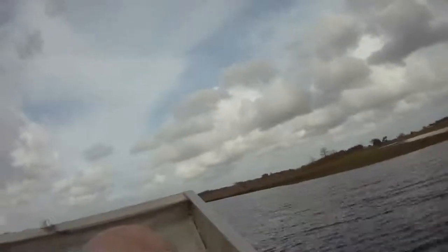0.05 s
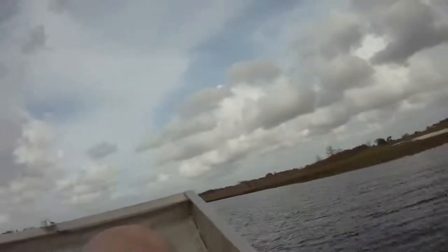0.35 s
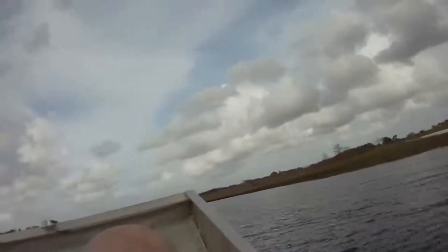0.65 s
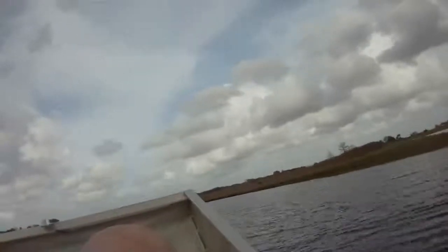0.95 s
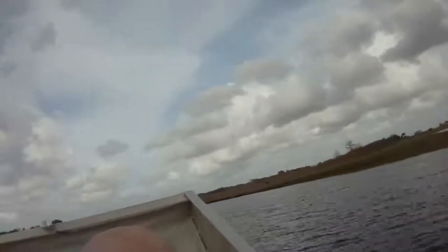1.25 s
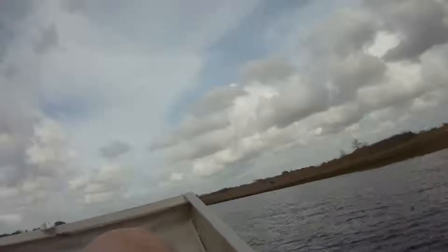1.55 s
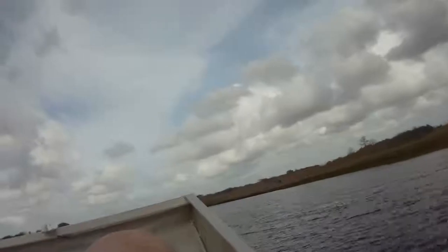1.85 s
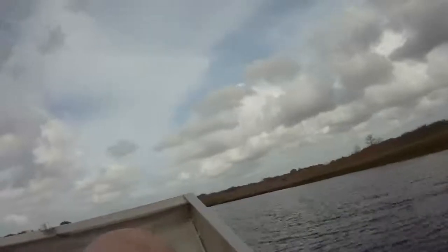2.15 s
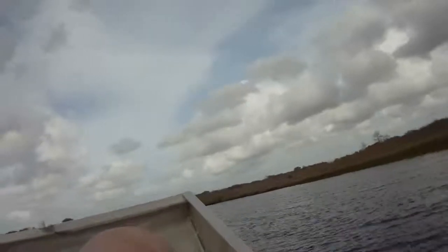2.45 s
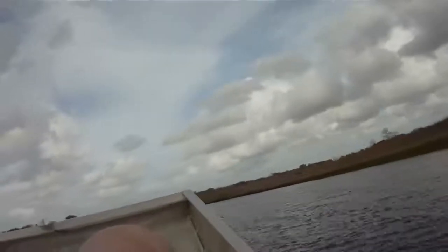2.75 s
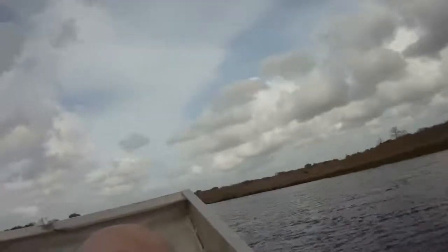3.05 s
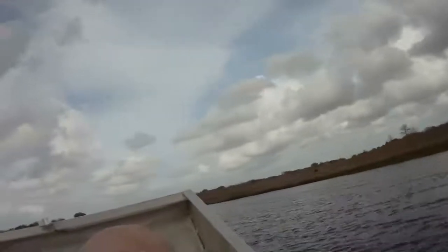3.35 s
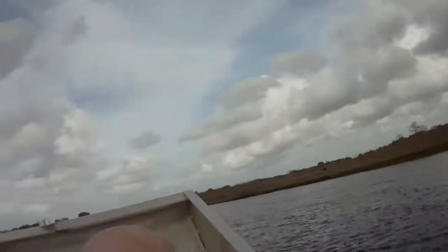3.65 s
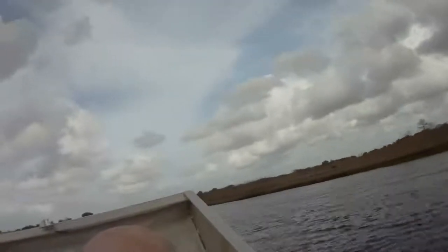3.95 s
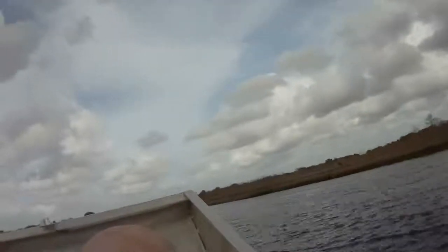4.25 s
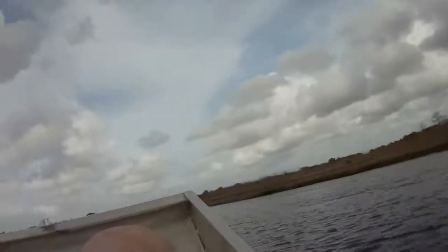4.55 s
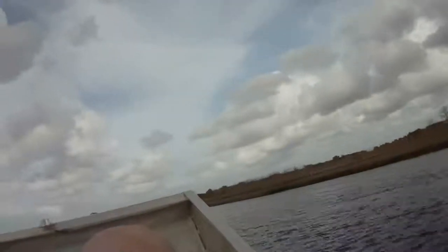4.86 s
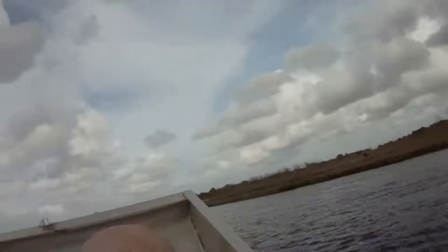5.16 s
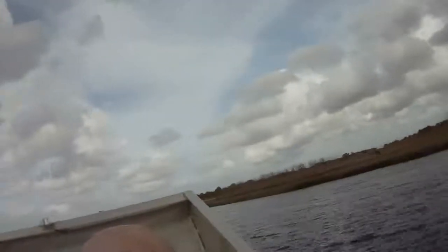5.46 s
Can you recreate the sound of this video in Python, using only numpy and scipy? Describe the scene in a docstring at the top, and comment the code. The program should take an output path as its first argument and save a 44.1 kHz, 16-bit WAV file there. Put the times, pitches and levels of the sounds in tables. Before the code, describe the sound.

From the first moment to the end, nearly six seconds later, an airboat engine runs loud and close at steady throttle, heard from a seat on board on open water. Its deep drone holds one pitch and is the loudest sound. Rapid, uneven exhaust blasts add a burble, a hard bark and a gassy rasp. The bark swells slightly around 0.3, 2.1 and 4.9 seconds. Beneath the engine, the propeller and the water under the hull make a constant, softer rush. The sound sits in the middle, almost the same in both ears. A fine crackle runs all the way through, with a few sharp ticks toward the right, the clearest at about 0.7, 1.2, 2.6, 3.6 and 5.2 seconds.

```python
"""On open water, from a seat on an airboat cruising at steady throttle.
The V8 engine fires eight uneven exhaust blasts per cycle. They make a deep drone and a burble in the
pipes, with a hard bark and a rasp of gas on each blast. Propeller and water add a steady rush.
Both ears hear nearly the same, but left and right slip apart for moments, which adds a fine crackle
with a few sharp ticks in it."""
import sys
import numpy as np
from scipy import signal
from scipy.fft import rfft, irfft
from scipy.io import wavfile
from scipy.ndimage import uniform_filter1d

SR = 44100
rng = np.random.default_rng(int(sys.argv[2]) if len(sys.argv) > 2 else 0)


def waveform_to_disk(signal):
    """Save audio, clipped to [-1, 1], as 16-bit WAV at the path in sys.argv[1]."""
    frames = np.transpose(np.atleast_2d(signal))
    scaled = np.clip(frames, -1, 1) * 32767
    samples = np.round(scaled).astype(np.int16)
    wavfile.write(sys.argv[1], SR, samples)


N = 251370
TIME = np.arange(N) / SR

# Engine speed, almost steady: time_s, speed_rpm
ENGINE_SPEED = [(0, 2917.7), (1.4, 2920.3), (3.2, 2917.3), (4.6, 2921.2), (5.7, 2913.1)]
# The eight exhaust blasts in one engine cycle: position_0_to_1, relative_level_db
BLASTS = [(.083, 5.5), (.235, -7), (.305, -0.5), (.418, 6), (0.636, 2), (.748, 6), (0.848, -4.5),
          (0.993, 3.5)]
# The tones that make up the drone: multiple_of_cycle_rate, relative_level_db
DRONE_TONES = [(1, -68), (2, -66), (3, -11), (4, -30.5), (5, -9.5), (6, -21.5), (7, -24.5), (8, -7),
               (9, -11), (10, -24.5), (11, -9), (12, -7), (13, -27), (14, -37), (15, -3.5), (16, -13.5),
               (17, -29.5), (18, -6), (19, -11), (20, -23), (21, -7), (22, -28), (23, -14), (24, 3),
               (25, -32), (26, -21), (27, -7), (28, -21), (29, -13.5), (30, -4), (31, -19.5), (32, -15.5),
               (33, -10), (34, -63), (35, -14.5), (36, -48), (37, -31), (38, -15)]
# Notes at which the exhaust pipes ring: pitch_hz, width_hz, gain_db
PIPE_NOTES = [(212, 38, -21.5), (382, 34, -14), (594, 20, 6.5), (720, 72, 4.5)]
# Slow rise and fall of the bark: time_s, gain_db
BARK_SWELL = [(0, 1.5), (.3, 2.5), (1.8, -1.5), (2.13, 2.5), (2.45, -2.5), (3.15, -0.3), (4.2, -2),
              (4.9, 2), (5.7, 0)]
# Tone colour of the crack at the front of a blast: pitch_hz, gain_db
BARK_COLOUR = [(780, -37), (920, 7), (1020, 8.5), (1300, 14.5), (1600, 8), (2100, -6), (2450, -9),
               (2670, 6.5), (2900, -9), (4500, -16), (7000, -42), (15000, -56)]
# Tone colour of the rasping gas: pitch_hz, gain_db
GAS_COLOUR = [(400, 5), (900, 11), (1600, 7.5), (2100, -0.5), (2450, 3.5), (2670, -6), (2900, -5.5),
              (4200, -7.5), (5200, -13), (6800, -23), (9000, -19.5), (11500, -50.5), (15000, -46)]
# How much the rush differs between left and right: pitch_hz, gain_db
WASH_SPREAD = [(120, -2), (280, -9), (550, -15), (1800, -12), (4000, -6), (10000, -5)]
# Tone colour of the propeller and water: pitch_hz, gain_db
WASH_COLOUR = [(20, -35), (60, -25), (120, -15.5), (220, -1.5), (600, 3.5), (800, -1.5), (1050, -14.5),
               (2000, -13.5), (2700, -17), (5200, -29), (6800, -27.5), (8500, -35.5), (11500, -32),
               (15000, -40.5)]
# The sharpest ticks: start_s, relative_level_db, pan_db (added on the left, taken off on the right)
TICKS = [(0.2467, -29, -10), (0.715, -26.5, -8), (1.248, -25, -8), (2.384, -30, -7), (2.617, -25, -2.5),
         (3.0833, -31, -9), (3.5507, -27, -10), (4.0845, -30, -8), (5.153, -26, -5)]
# Tone colour of a tick: pitch_hz, gain_db
TICK_COLOUR = [(300, 4), (1500, 10), (5000, 4), (10000, -1.5), (15000, -3)]


def undb(db):
    """Turn decibels into a number to multiply by."""
    return 10 ** (np.asarray(db) / 20)


def level(x, db):
    """Set a sound's average (rms) level."""
    return x * undb(db) / np.sqrt(np.mean(x ** 2))


def colour(x, points):
    """Turn lows and highs up or down along a curve of (pitch_hz, gain_db) points."""
    hz, db = np.transpose(points)
    f = np.maximum(np.arange(N // 2 + 1) * SR / N, 1)
    return irfft(rfft(x) * undb(np.interp(np.log(f), np.log(hz), db)), N)


def resonance(f, pitch_hz, width_hz):
    """How a ringing pipe passes and delays each frequency f."""
    return 1j * f * width_hz / (pitch_hz ** 2 - f ** 2 + 1j * f * width_hz)


def wander(per_s):
    """A smooth random curve of typical size 1, with per_s new values a second."""
    step = int(SR / per_s)
    held = np.repeat(rng.standard_normal(N // step + 1), step)[:N]
    return level(uniform_filter1d(uniform_filter1d(held, step), step), 0)


def clicks(times, sizes):
    """Clicks, each shared between its two nearest samples."""
    at = np.clip(times * SR, 0, N - 2)
    i = at.astype(int)
    return np.bincount(i, sizes * (1 - at + i), N) + np.bincount(i + 1, sizes * (at - i), N)


def firings(cycles, scatter_db, jitter_s):
    """Time and strength of every blast; no two burns of fuel are quite alike."""
    position, db = np.transpose(BLASTS)
    due = (np.arange(-1, cycles[-1] + 1)[:, None] + position).ravel()
    late, strong = rng.standard_normal((len(due), 2)).T
    times = np.interp(due, cycles, TIME) + jitter_s * late
    sizes = undb(np.resize(db, len(due)) + scatter_db * np.clip(strong, -2, 1))
    heard = (due > 0) & (due < cycles[-1])
    return times[heard], sizes[heard]


def drone(cycles, db, waver_db, pipe_hz, pipe_width_hz):
    """The repeating blasts make a stack of tones, each delayed by the pipe's main ring."""
    position, blast_db = np.transpose(BLASTS)
    cycle_hz = cycles[-1] * SR / N
    out = 0
    for multiple, tone_db in DRONE_TONES:
        push = -np.sum(undb(blast_db) * np.exp(-2j * np.pi * multiple * position))
        phase = np.angle(push * resonance(multiple * cycle_hz, pipe_hz, pipe_width_hz))
        gain = undb(tone_db + waver_db * wander(per_s=6))
        out = out + gain * np.cos(2 * np.pi * multiple * cycles + phase)
    return level(out, db)


def burble(times, sizes, db):
    """Each burn pushes a bit too much or too little, ringing the pipes between the drone's tones."""
    kicks = clicks(times, np.sqrt(sizes) * (rng.random(len(times)) - .5))
    f = np.arange(N // 2 + 1) * SR / N
    pipes = sum(undb(gain_db) * resonance(f, hz, width) for hz, width, gain_db in PIPE_NOTES)
    return level(irfft(rfft(kicks) * pipes, N), db)


def overload(x, ceiling_db):
    """Heavy low notes overload the microphone, which evens them out and drops the deepest rumble."""
    limited = undb(ceiling_db) * np.tanh(x / undb(ceiling_db))
    return colour(limited, [(15, -20), (65, 0)])


def bark(times, sizes, db, lead_s, lead_share, cluster_db, clusters_per_s):
    """Each blast is a short, uneven push, then a sharp suck; they hit harder in random clusters."""
    swell_db = np.interp(times, *np.transpose(BARK_SWELL))
    surge_db = cluster_db * np.interp(times, TIME, wander(clusters_per_s))
    suck = sizes * undb(swell_db + surge_db)
    push = lead_share * suck * 2 * rng.random(len(times))
    pressure = clicks(times - lead_s, push) - clicks(times, suck)
    return level(colour(pressure, BARK_COLOUR), db)


def gas_rasp(times, sizes, db, puff_s, tail_s, tail_share):
    """Swirling gas hisses in a short puff around each blast, with a weak tail."""
    t = np.arange(-1000, 1001) / SR
    puff = np.exp(-np.abs(t) / puff_s)
    tail = tail_share * (t > 0) * np.exp(-np.abs(t) / tail_s)
    flow = signal.fftconvolve(clicks(times, sizes), puff + tail, "same")
    middle, side = rng.standard_normal((2, N))
    hiss = middle + undb(-30) * np.array([side, -side])  # almost the same in both ears
    return level(colour(flow * hiss, GAS_COLOUR), db)


def wash(db, flicker_db):
    """The rush of air churned by the propeller and of water under the hull."""
    middle, side = rng.standard_normal((2, N))
    side = colour(side, WASH_SPREAD)
    rush = colour(middle + np.array([side, -side]), WASH_COLOUR)
    return level(rush * undb(flicker_db * wander(per_s=250)), db)


def crackle(sound, share, slip_s, length_s, beats_per_s):
    """On some beats of a fast, even pulse, left and right each jump briefly out of step."""
    first_s = .0147
    starts = np.arange(first_s, N / SR, 1 / beats_per_s)
    nearest = np.clip(np.round((TIME - first_s) * beats_per_s).astype(int), 0, len(starts) - 1)
    age_s = TIME - starts[nearest]
    dice = rng.uniform(0, 1, (len(starts), 5))[nearest].T
    chosen = dice[0] < share
    out = []
    for channel, jump, hold in zip(sound, dice[1:3], dice[3:5]):
        slipping = chosen & (age_s > 0) & (age_s < (.5 + hold) * length_s)
        blend = uniform_filter1d(slipping.astype(float), size=9)
        shifted = np.interp(TIME + slip_s * (2 * jump - 1), TIME, channel)
        out.append(channel + blend * (shifted - channel))
    return np.array(out)


def ticks(gain_db, delay_s):
    """Single sharp ticks, louder on the right."""
    times, db, pan_db = np.transpose(TICKS)
    pair = [clicks(times + delay_s, undb(db + gain_db + side * pan_db)) for side in (1, -1)]
    return colour(np.array(pair), TICK_COLOUR)


def scene():
    """One turning crankshaft times all the engine sounds, over the rush of air and water."""
    rpm = np.interp(TIME, *np.transpose(ENGINE_SPEED))
    cycles = np.cumsum(rpm) / (2 * 60 * SR)  # one engine cycle takes two turns
    cycles += 0.00082 * wander(per_s=13)  # the crank runs slightly early and late
    times, sizes = firings(cycles, scatter_db=3.5, jitter_s=.00006)
    hum = drone(cycles, db=-15.0, waver_db=1.5, pipe_hz=582.5, pipe_width_hz=80)
    hum = overload(hum + burble(times, sizes, db=-27.5), ceiling_db=-4)
    barks = bark(times, sizes, db=-31.5, lead_s=0.000766, lead_share=0.43,
                 cluster_db=1.0, clusters_per_s=20)
    rasp = gas_rasp(times, sizes, db=-30.5, puff_s=0.0022, tail_s=0.0021, tail_share=0.15)
    return hum + barks + rasp + wash(db=-25, flicker_db=1.0)


def record(dry):
    """Round off the tallest peaks, add crackle and ticks, and cut the highest treble."""
    rounded = dry / (1 + dry ** 6) ** (1 / 6)
    crackling = crackle(rounded, share=.6, slip_s=0.001117, length_s=0.00267, beats_per_s=29.97)
    crackling += ticks(gain_db=13.5, delay_s=0.001096)
    treble_cut = signal.ellip(10, .2, 80, 15400, fs=SR, output="sos")  # steep above 15400 Hz
    return signal.sosfilt(treble_cut, crackling)


dry = scene()
out = record(dry)
waveform_to_disk(out)
```